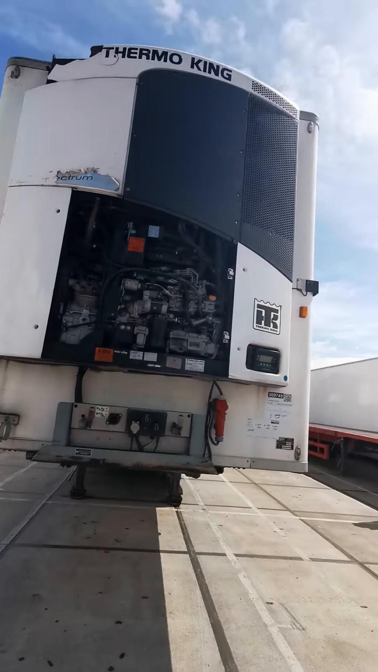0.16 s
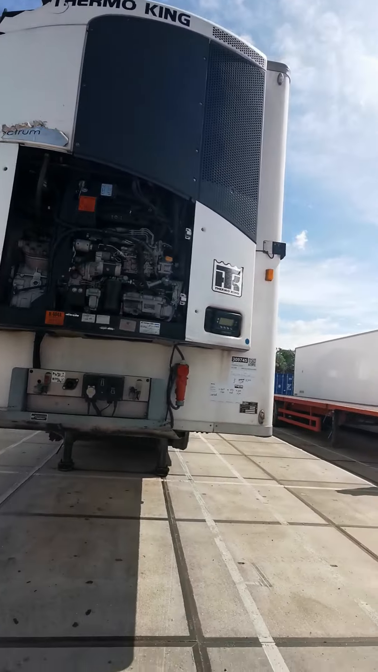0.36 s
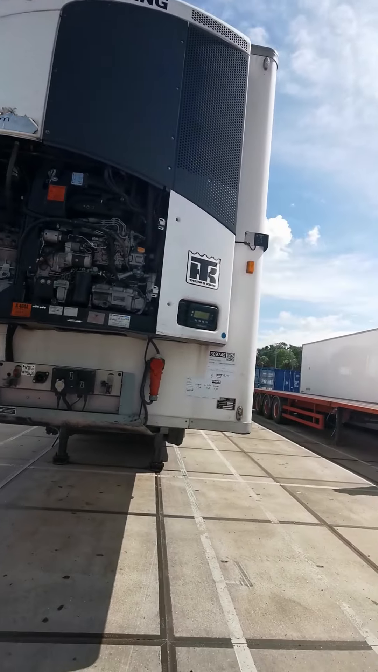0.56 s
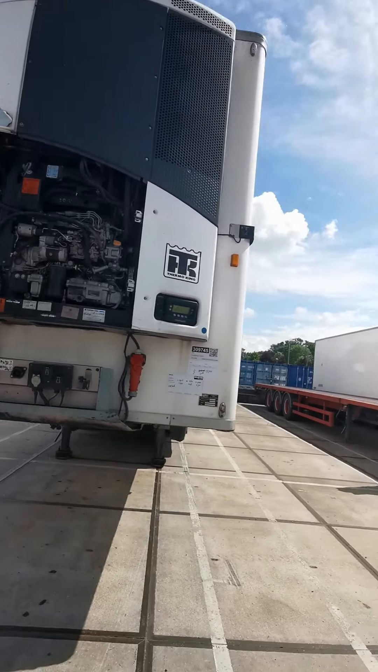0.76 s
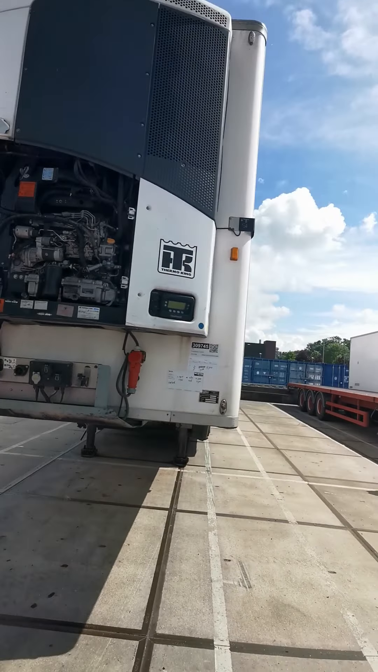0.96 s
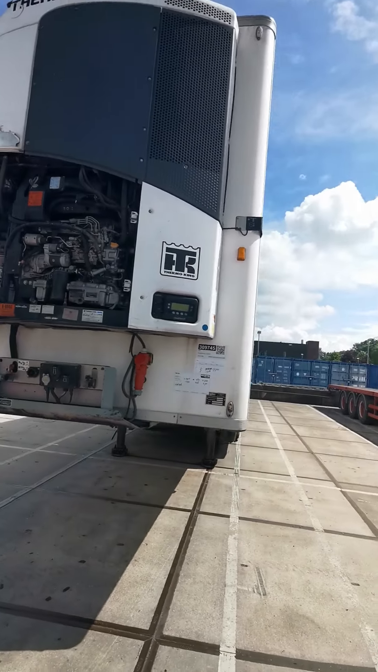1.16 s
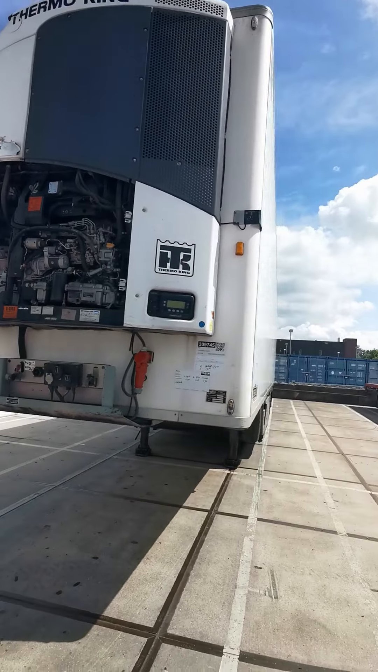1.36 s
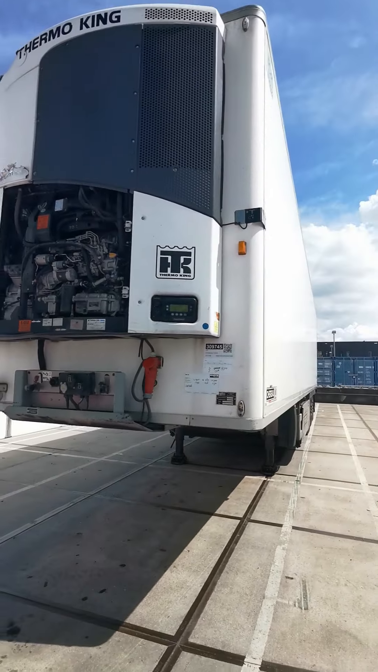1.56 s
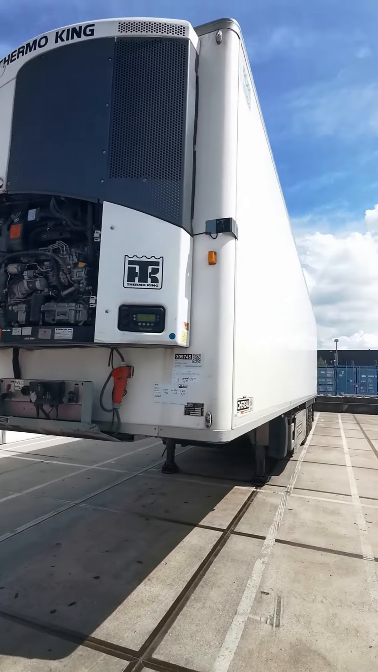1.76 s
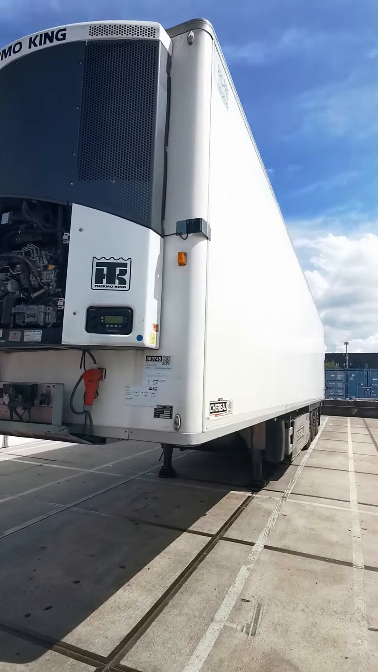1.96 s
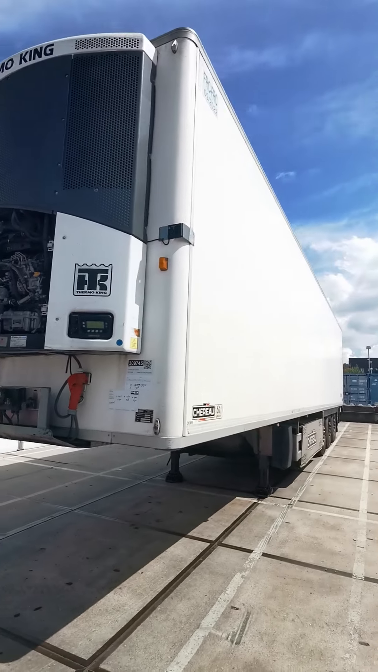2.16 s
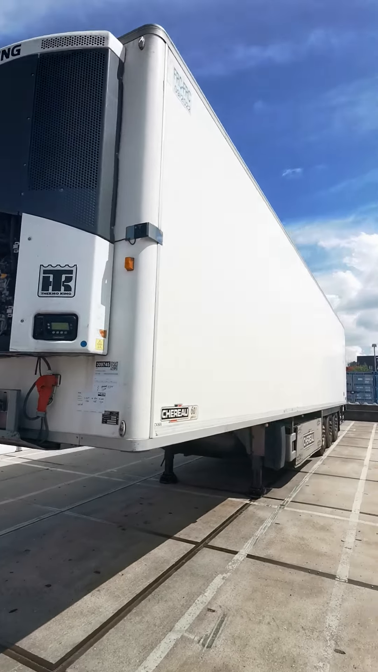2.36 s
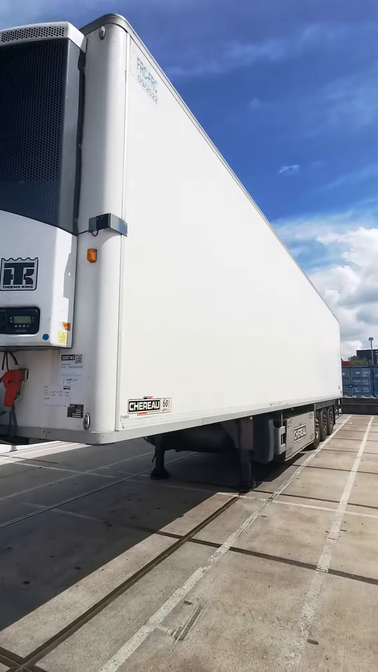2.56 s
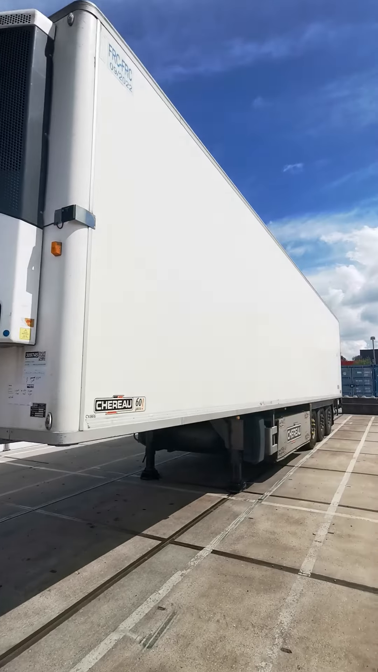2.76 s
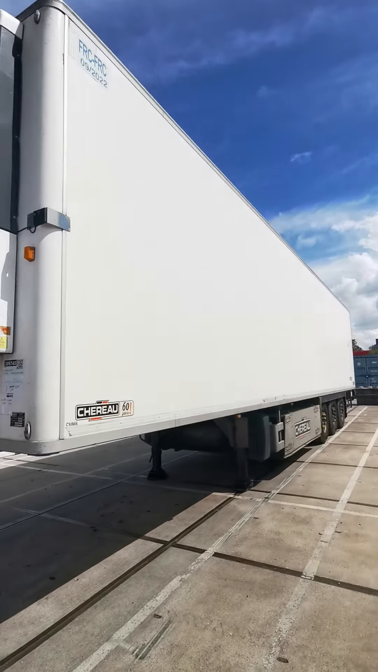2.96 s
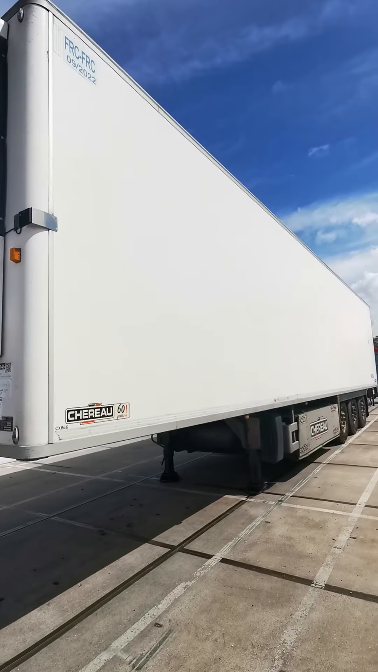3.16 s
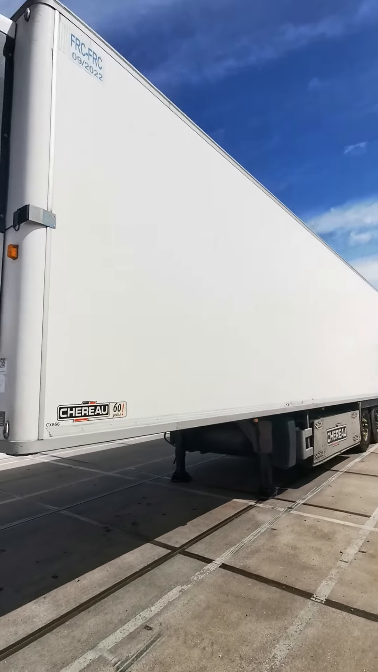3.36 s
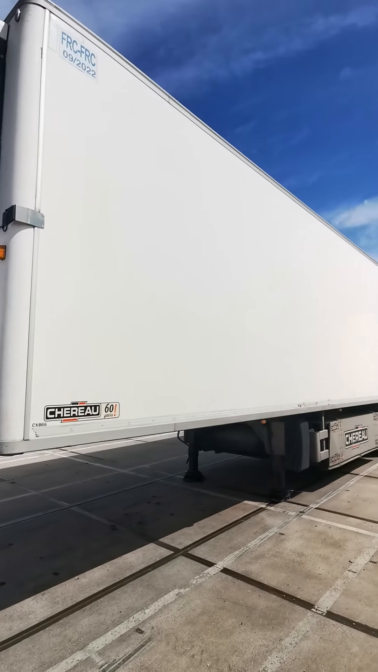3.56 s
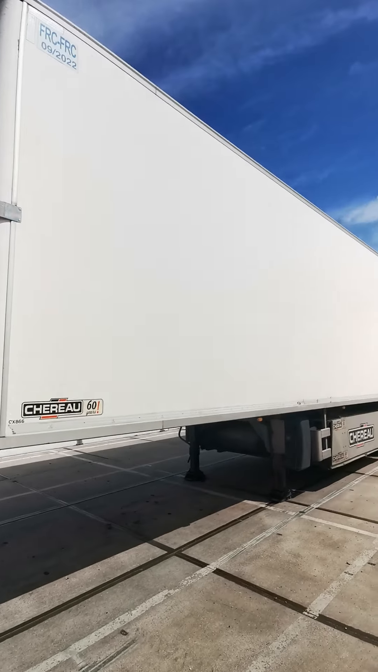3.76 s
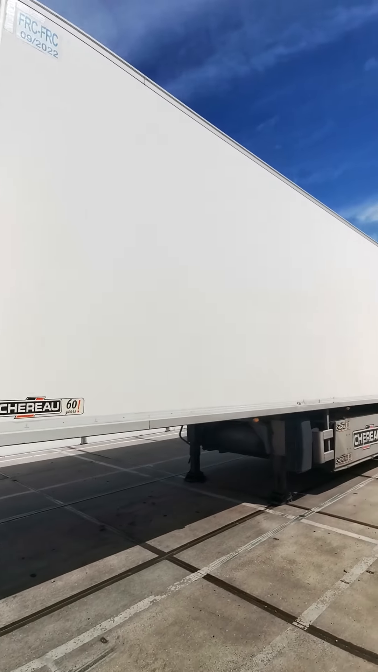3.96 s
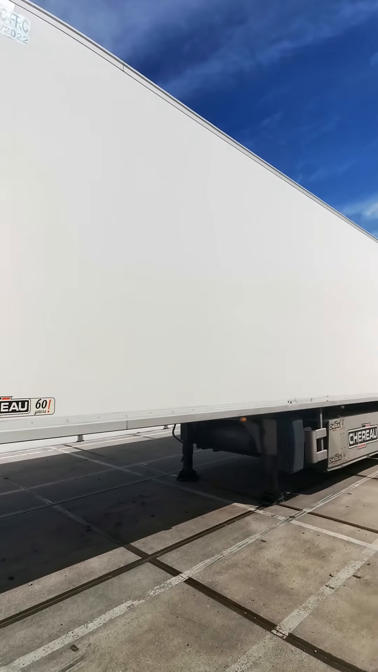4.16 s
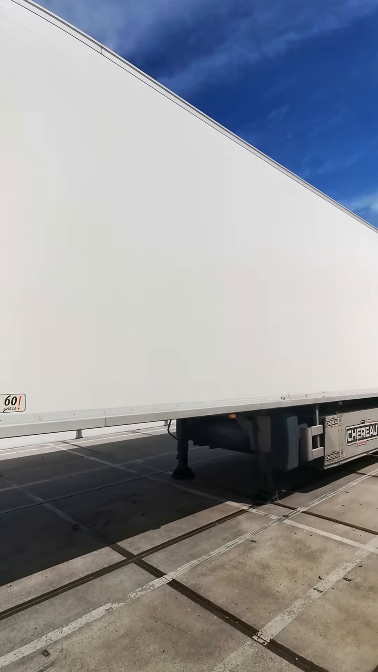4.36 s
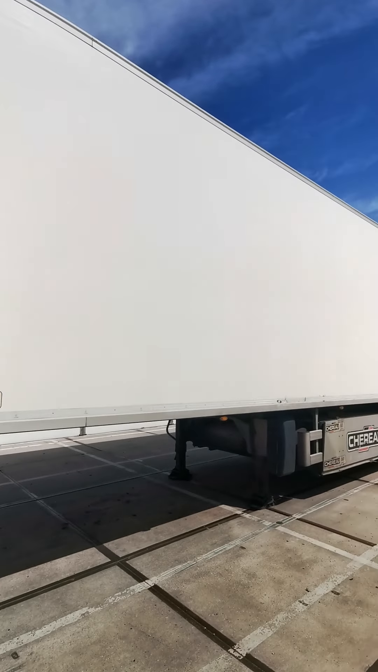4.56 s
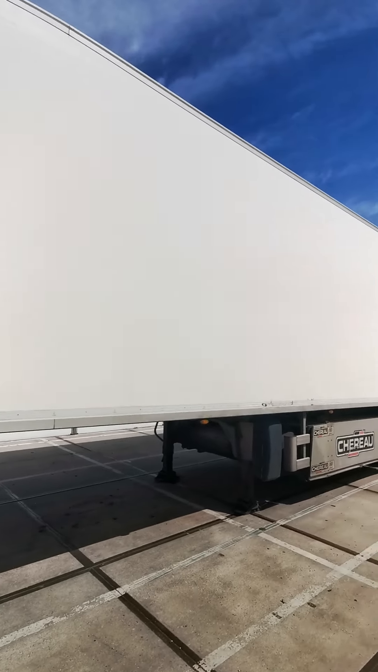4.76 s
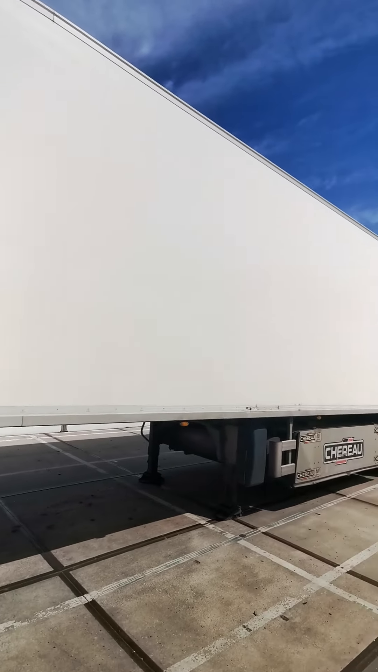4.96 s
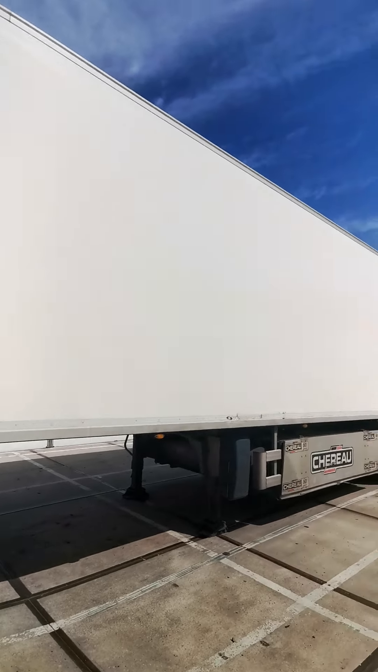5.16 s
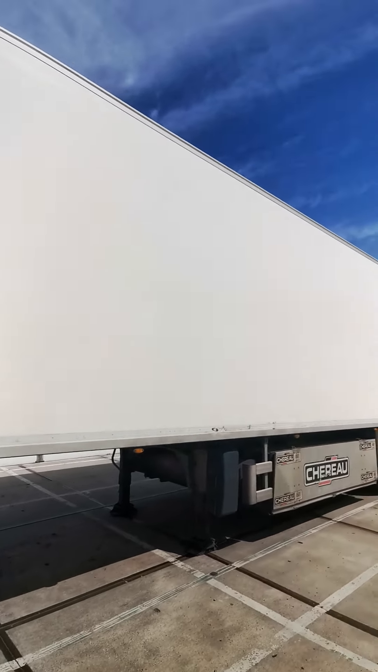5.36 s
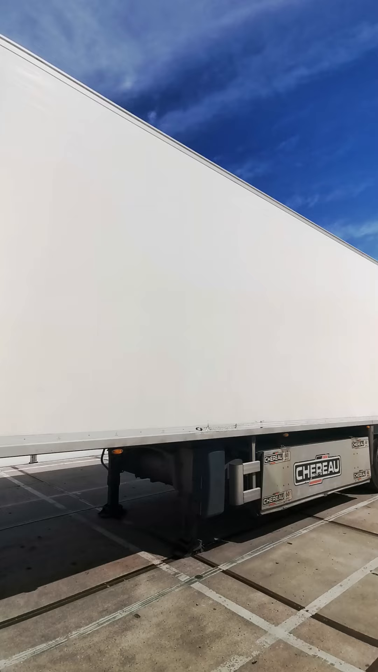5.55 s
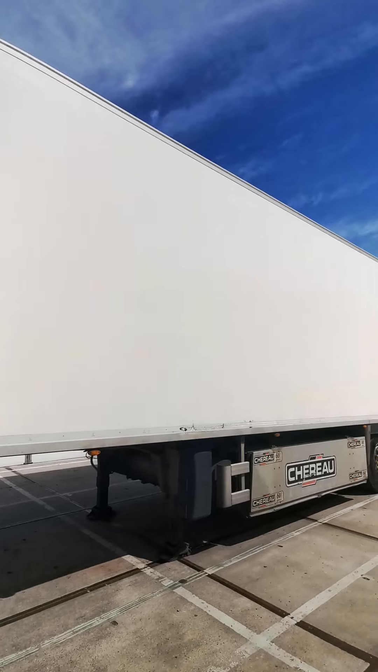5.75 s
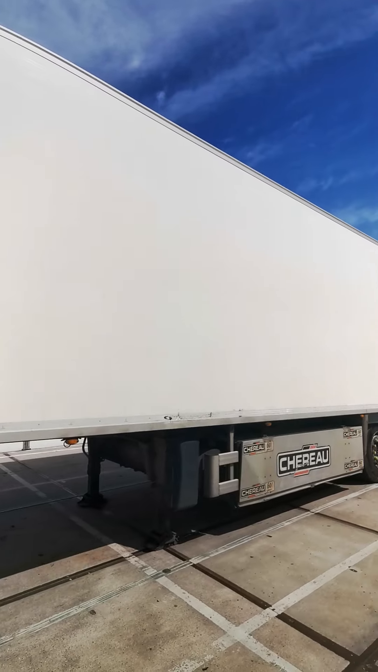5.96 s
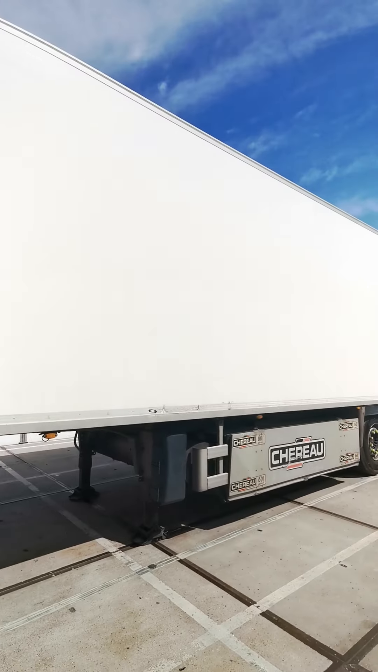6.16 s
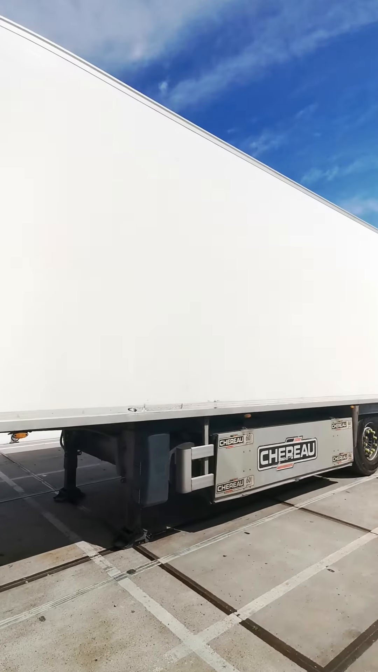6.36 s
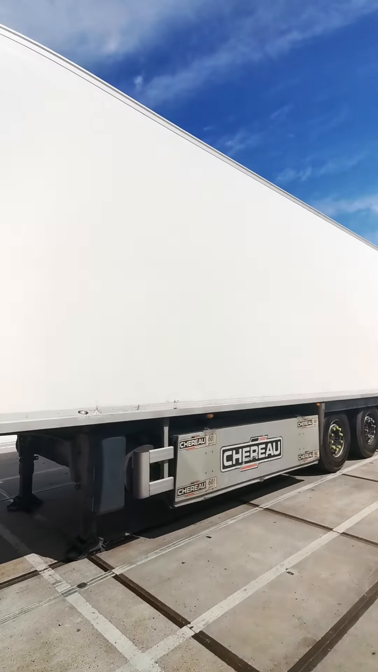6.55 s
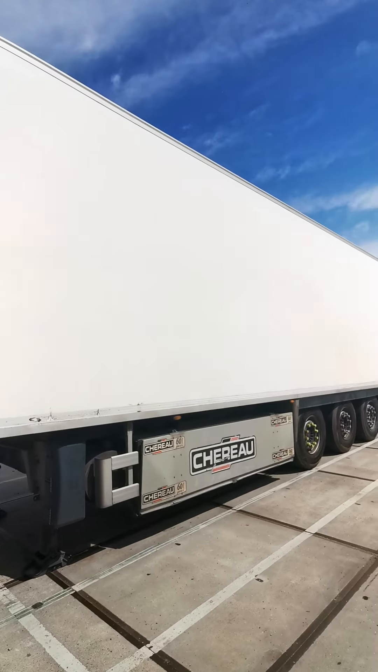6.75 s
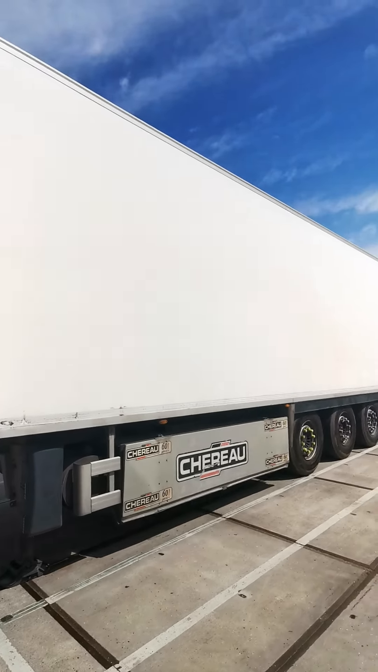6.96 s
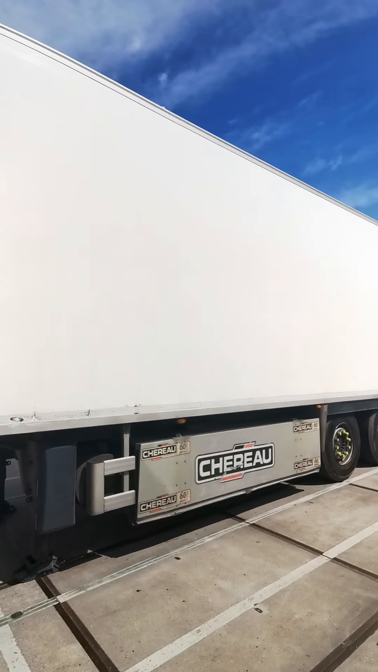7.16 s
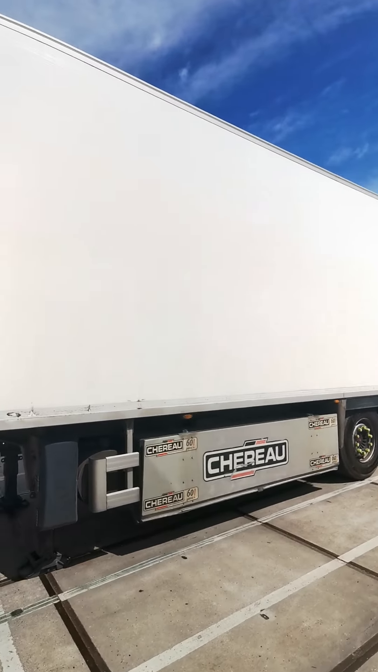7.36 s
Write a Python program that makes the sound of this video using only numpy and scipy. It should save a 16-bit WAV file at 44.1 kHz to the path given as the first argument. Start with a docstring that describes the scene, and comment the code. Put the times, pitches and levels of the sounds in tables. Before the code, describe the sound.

A small diesel engine clatters and hums steadily in an open yard, fading to a dull drone as the microphone moves away amid wind bumps and sharp clicks.

```python
"""A four-cylinder diesel on a trailer refrigeration unit runs at a steady speed in an open yard.
First the microphone is about 2 m from the open engine bay: clatter from noise swelling at each firing, hum from crank orders.
From 1.3 s to 2.3 s gusts, surges and dull bumps of filtered noise catch it; near 3 s it rounds the corner past the side grille.
At 4.3 s a side panel rings; from 4.9 s ticks ring the right port and duck the gain, with brief rubs from 5.1 s.
Alongside the trailer, out to 9.5 m, the clatter is faint and dull while the exhaust hum stays."""
import sys
import numpy as np
from scipy import signal
from scipy.fft import rfft, irfft, next_fast_len
from scipy.io import wavfile
from scipy.ndimage import uniform_filter1d, minimum_filter1d

SR = 44100
rng = np.random.default_rng(int(sys.argv[2]) if len(sys.argv) > 2 else 0)


def file_out(sig):
    """Save sig as 16-bit WAV at sys.argv[1]."""
    # one column per channel
    cols = np.atleast_2d(sig).T
    # limit, then scale
    lim = np.clip(cols, -1, 1)
    pcm = np.round(lim * 32767).astype(np.int16)
    wavfile.write(sys.argv[1], SR, pcm)


N = 330309
TIME = np.arange(N) / SR

# Levels are relative settings; each source adds its own gain.
# walk away from the engine bay: [t/s, distance to the engine/m]
WALK = [(0, 1.94), (0.8, 1.96), (3.1, 2.71), (4.4, 3.9), (5.2, 5.64), (7.4, 9.5)]
# how far the trailer hides the engine: [t/s, 0 open bay .. 1 corner .. 2 alongside]
SHADOW = [(0, 0.41), (1.2, 0.44), (2.4, 0.88), (4.0, 1.19), (4.7, 1.23), (5.4, 2.15), (7.5, 2.245)]
# steady breeze: [t/s, buffeting level/dB, rush level/dB]
BREEZE = [(0, -33, -30.5), (1.8, -32, -31.5), (2.9, -53, -28.5), (4.2, -29.5, -28), (5.1, -31, -30),
          (7.4, -27.5, -31.5)]
# gusts on top of it: [t/s, half length/s, buffeting level/dB, rush level/dB]
GUSTS = [(.17, .22, -33, -35), (1.33, 0.056, -20, -23.5), (2.093, 0.12, -28, -27), (2.207, .055, -19, -25),
         (4.0, 0.14, -27, -47), (4.955, 0.15, -20.5, -40), (5.444, 0.03, -45, -31.5),
         (5.805, 0.054, -41, -30.5), (6.29, 0.42, -30, -44), (7.43, 0.11, -22.5, -46)]
# spectrum of the buffeting: [f/Hz, level/dB]
BUFFET_SPECTRUM = [(10, -26), (22, 0), (35, -0.5), (60, -6.5), (95, 0), (135, -4), (220, -40), (800, -110)]
# spectrum of the rushing air: [f/Hz, level/dB]
RUSH_SPECTRUM = [(80, -2), (115, -15.5), (155, 3), (250, -2.5), (330, -9), (430, -13), (560, -16),
                 (900, -20.5), (2000, -32)]
# air surging across the microphone: [t of breaking off/s, build-up/s, level/dB]
SURGES = [(1.39, .08, -33), (1.93, .06, -32), (2.11, .1, -28.5), (2.272, .1, -26)]
# dull bumps on the microphone: [t/s, level/dB]
BUMPS = [(1.335, -22), (2.04, -22), (2.215, -23), (2.238, -21), (6.305, -19.5)]
# ticks at the right port: [t/s, level/dB, extra drive of the top two resonances/dB]
TICKS = [(4.897, -21, -8), (5.0424, -22, -3), (5.057, -6.5, -4), (5.2182, 2, 2.5), (5.9041, -5.5, 2.5),
         (5.9814, -15, 1), (6.1626, -8, 1), (6.6182, -21, -7), (6.6377, -18.5, 2), (6.7932, -22.5, -4),
         (6.9973, -9, 3.5), (7.0604, -10, -3), (7.1667, -11.5, -10), (7.2152, -18.5, -6), (7.4843, -3, 7.5)]
# a finger brushing the port: [t/s, level/dB, time constant of swell and fade/s]
RUBS = [(5.108, -26.5, 0.027), (5.28, -38, 0.058), (7.275, -49, 0.027)]
# resonances of the microphone port: [f/Hz, width/Hz, level/dB]
PORT_RESONANCES = [(2600, 1400, -2), (5000, 2400, -2), (6600, 700, -1), (10900, 1800, -8),
                   (14800, 2500, -18)]
# likeness of the two channels: [f/Hz, coherence]
LIKENESS = [(40, 0.057), (130, 0.33), (290, 0.75), (640, 0.64), (1400, 0.98), (2100, 0.48), (3000, 0.05),
            (15000, 0.05)]
# phase by which the left port leads the right: [f/Hz, phase/rad]
LEFT_LEAD = [(60, 0.015), (200, 0.0078), (650, -0.2), (1500, 1.64), (2200, 1.51)]
# ring of the injectors: [f/Hz, t60/s]
INJECTOR_MODES = [(3480, .02), (3720, .024), (3990, .018)]
# ring of the block under the hard knock: [f/Hz, t60/s]
KNOCK_MODES = [(1660, .02), (1775, .05), (1850, .052), (1945, .04), (2100, .022)]
# openings that beam the knock: [t of passing/s, half the time in the beam/s, level/dB]
KNOCK_BEAMS = [(.9, .22, 5), (2.9, .7, 4)]
# engine colour at the open bay, the corner and alongside, per port: [f/Hz, level/dB]
BAY_LEFT = [(300, 1), (450, 0.5), (650, 0), (900, -2), (1500, -12), (1850, -6), (2550, -1.5), (3000, -6),
            (5000, -8), (6900, -5.5), (8000, -15.5), (12000, -24), (15700, -34)]
BAY_RIGHT = [(300, 12), (480, -11), (650, 4.5), (950, -3.5), (1300, 0.5), (1850, -1), (2200, 2.5),
             (3000, -8.5), (6500, -4), (7600, -21), (9500, -16), (10800, -12), (13800, -21), (15500, -11)]
CORNER_LEFT = [(300, -1), (500, 1.5), (700, -5.5), (1400, -2), (1850, -8), (2600, -2), (3200, -8),
               (5000, -14.5), (6900, -13), (8000, -23), (12000, -31), (15700, -35)]
CORNER_RIGHT = [(300, 5), (620, 7), (1000, 1.5), (1400, 3.5), (1850, 7.5), (2150, 7), (2900, -7),
                (4200, -6), (6600, -18), (7800, -25), (9500, -24.5), (10800, -16), (14000, -23),
                (15500, -19)]
SIDE_LEFT = [(300, -3), (500, 13.5), (700, -7), (1400, -2), (1850, -1), (2400, -5), (3500, -7),
             (5000, -11.5), (6900, -13), (8000, -23.5), (12000, -31), (15700, -44)]
SIDE_RIGHT = [(300, 14), (500, 12), (780, 7.5), (1350, 5), (1650, 0.5), (2300, 3), (3300, -6.5),
              (6500, -10), (7700, -25), (9500, -22.5), (10900, -14), (13500, -26), (15500, -22)]
# belt-driven fans and alternator: [f/Hz, level/dB, left minus right/dB]
FAN_TONES = [(233.8, -35, 1), (250.2, -39, 7), (446, -52.5, -1.5)]
# weaker crank orders, each with its own beam: [order, level/dB, t of passing/s, half the time in it/s]
OVERTONES = [(4.5, -31, 1.8, 5.1), (5.5, -39, 1.5, 2.2), (13, -42, 1.4, .8), (13, -40, 4.2, .6),
             (14, -45, 1.4, 1), (15, -42, .3, .4), (18, -44, 1.6, .4), (19, -45, 1.3, .8),
             (20, -41.5, .4, .7), (20, -39, 2.7, .5), (21, -39, 2.4, 1), (22, -43, .3, .4),
             (23, -37, 1.7, .4), (23, -39, 3.5, .4), (24, -41, 1.2, .7), (26, -43, 2, 2.5),
             (28, -43, .6, .7), (30, -43, .8, .6), (32, -42, 1, .55), (34, -46, 2.2, 2), (38, -43, .3, .35),
             (51.5, -42, .9, .35), (51.5, -41, 3.4, .4), (54, -41, 1.6, .4), (58, -42, .7, .8),
             (60, -43, .7, .6), (60, -43, 2.7, .5), (63, -42, 2.6, .6), (66.5, -43, 1.8, .5),
             (68, -43, .9, .35), (72, -45, 1.3, .7)]
# strong crank orders: [order, level/dB, share of the exhaust's fall, standing-wave swing/dB,
# t of a crest/s, time between crests/s]
STRONG_ORDERS = [(2, -22, 0.8, 1, 0.091, 2.97), (3, -40, 0.35, -3, 5.1, 1.8), (4, -17, 1.12, 0.5, 1.5, 4.6),
                 (6, -29.5, 0.35, 2.5, 0.11, 3.27), (8, -39.5, 0.15, 1, 0.9, 2.7),
                 (10, -35, 0.51, 3.5, 1.4, 4.8), (12, -38.5, 0.69, 5, 2.01, 3.1),
                 (14, -52.5, 0.47, -1, 0.95, 2)]
# exhaust hum, falling as the roof edge hides the pipe: [t/s, level/dB]
EXHAUST = [(0, -1.5), (1.7, -4), (2.8, -10.5), (4.1, -10.5), (5.2, -17.5), (6.8, -13.5)]

CRANK_HZ = 30.36
KNOCK_CYLINDER_DB, INJECTOR_CYLINDER_DB = (-10, -12, 0, -9), (-2, -1, 2, -2)   # in firing order
FIRING_VARY_DB = 1.2   # no two firings are equally strong
FIRING_LAG_TURNS, FIRING_JITTER_S = .235, .0004
BOOM_LAG_S, BOOM_REACH_M = 0.0042, (2.4, 4.2)   # full lag up to the first distance, none past the second
PORT_LAG_S = 0.000082   # the hum reaches the right port this much later
CLATTER_DB, HISS_DB = -23, -28   # source settings before the distance loss
FAN_BEAM_DB, FAN_BEAM_S, FAN_BEAM_HALF_S = 3, 3.46, 1.53   # the side grille beams the fan hiss
PANEL_HZ, PANEL_WIDTH_HZ, PANEL_BEAM_S, PANEL_BEAM_HALF_S = 2160, 61, 4.3, 0.5
WAFT_DB = 0.92   # moving air makes the hidden engine swell and sink
THROB = 0.35   # depth of the firings in the rush of air
CUTOFF_HZ = 15900


def from_db(db):
    """Amplitude factor of a level in dB."""
    return 10 ** (np.asarray(db) / 20)


def rms_one(x):
    """Scale to an RMS of one."""
    return x / np.sqrt(np.mean(x ** 2) + 1e-20)


def in_time(rows):
    """Each column of a curve at every sample."""
    s, *columns = np.transpose(rows)
    return [np.interp(TIME, s, c) for c in columns]


def at_hz(points, hz):
    """A spectrum read on a log-frequency axis."""
    f, value = np.transpose(points)
    return np.interp(np.log(hz + 1e-3), np.log(f), value)


def drift(rate_hz):
    """Slow random wander of unit RMS, computed every 100 samples."""
    r = np.exp(-200 * np.pi * rate_hz / SR)
    noise = rng.standard_normal(N // 100 + 2002)
    slow = signal.lfilter([1], [1, -2 * r, r * r], noise)[2000:]   # drop the filter's start
    return np.interp(np.arange(N) / 100, np.arange(len(slow)), rms_one(slow))


def lobe(s, half_s):
    """A bell in time, 0 to 1: passing a beam of sound, or a gust coming and going."""
    return np.exp(-((TIME - s) / half_s) ** 2)


def pan(left_minus_right_db):
    """Gains of the left and right channel."""
    return from_db([[left_minus_right_db / 2], [-left_minus_right_db / 2]])


def cut(x, hz, kind, order=2):
    """Butterworth filter."""
    return signal.sosfilt(signal.butter(order, hz, kind, fs=SR, output="sos"), x)


def coloured(pair, left, right):
    """Two unrelated noises become stereo with the given spectra, port likeness and phase lead."""
    size = next_fast_len(N)
    hz = np.arange(size // 2 + 1) * SR / size
    mid, side = rfft(pair, size)
    alike = np.clip(at_hz(LIKENESS, hz), -1, 1)
    both = np.sqrt(1 + alike) * mid + np.sqrt(1 - alike) * side * [[1], [-1]]
    both[1] *= np.exp(-1j * at_hz(LEFT_LEAD, hz))
    return irfft(both * from_db([at_hz(left, hz), at_hz(right, hz)]), size)[:, :N]


def air_flow():
    """Strength of buffeting and of rush: each gust swells and dies on top of the breeze."""
    power = from_db(in_time(BREEZE)) ** 2
    for s, half_s, buffet_db, rush_db in GUSTS:
        power = power + from_db([[buffet_db], [rush_db]]) ** 2 * lobe(s, half_s)
    return np.sqrt(power)


def wind(turns, lumps_db=2.0, flutter_db=1.0, buffet_gain_db=-4.5, rush_gain_db=0.0, apart=0.43, left_db=0.53):
    """Lumpy bass buffeting, partly each port's own, and a rush of air and exhaust gas throbbing with firings."""
    buffeting, rushing = air_flow()
    eddies = rms_one(cut(rng.standard_normal((2, N)), [20, 70], "band"))
    shared = rms_one(coloured(rng.standard_normal((2, N)), BUFFET_SPECTRUM, BUFFET_SPECTRUM))
    buffet = (shared + apart * eddies) * rms_one(from_db(lumps_db * drift(15)))
    rush = cut(coloured(rng.standard_normal((2, N)), RUSH_SPECTRUM, RUSH_SPECTRUM), 1280, "low")
    rush = rms_one(rush * from_db(flutter_db * drift(34)))
    rush = rms_one(rush * (1 + THROB * np.cos(4 * np.pi * turns)))   # two firings a turn
    # the left port takes more of the air, most of all alongside the trailer
    lean = from_db(left_db * (in_time(SHADOW)[0] + 1.0) * np.array([[1], [-1]]))
    return (from_db(buffet_gain_db) * buffeting * buffet + from_db(rush_gain_db) * rushing * rush) * lean


def surges(band_hz=(220, 470), stop_s=.012, apart=.5):
    """Air catches the edge of the microphone: a hollow roar builds and breaks off."""
    push = sum(from_db(db) * np.exp(-np.maximum((s - TIME) / build_s, (TIME - s) / stop_s))
               for s, build_s, db in SURGES)
    air = rng.standard_normal(N) + apart * rng.standard_normal((2, N))
    return push * rms_one(cut(air, band_hz, "band", order=3))


def bumps(decay_s=.014, low_hz=150, high_hz=480):
    """Each bump on the microphone is a short, dull puff of noise that starts at once and dies away."""
    push = sum(from_db(db) * (TIME >= s) * np.exp(-np.abs(TIME - s) / decay_s) for s, db in BUMPS)
    puff = rms_one(cut(rng.standard_normal(N), [low_hz, high_hz], "band"))
    return cut(push * puff, 520, "low", order=6)


def port(x, bright):
    """The resonances of the microphone port, in parallel; the top two have their own drive."""
    out = 0
    for k, (hz, width_hz, db) in enumerate(PORT_RESONANCES):
        r = np.exp(-np.pi * width_hz / SR)
        drive = (bright if k > 2 else x) + 1e-18
        poles = [1, -2 * r * np.cos(2 * np.pi * hz / SR), r * r]
        ring = signal.lfilter([(1 - r * r) / 2, 0, (r * r - 1) / 2], poles, drive)
        out = out + (-1) ** k * from_db(db) * ring
    return out


def handling(tick_db=3.5, grain_db=-1.5, leak_db=-30, rub_hz=(5400, 9500)):
    """Sharp ticks and grainy rubs ring the right port and barely reach the left."""
    clicks = np.zeros((2, N))   # drives of the lower and of the top resonances
    for s, db, bright_db in TICKS:
        clicks[:, min(round(s * SR), N - 1)] = from_db(db + tick_db) * from_db([0, bright_db])
    height = np.abs(port(signal.unit_impulse(64), signal.unit_impulse(64))).max()
    friction = cut(rng.standard_normal(N), rub_hz, "band") * from_db(grain_db * drift(120))
    pressure = sum(from_db(db) * np.exp(-np.abs(TIME - s) / swell_s) for s, db, swell_s in RUBS)
    rub = pressure * rms_one(port(friction, friction))
    return (port(*clicks) / height + rub) * from_db([[leak_db], [0]])


def crank(wander=.0004):
    """Turns of the crankshaft; the governor holds the speed almost still."""
    return np.cumsum(CRANK_HZ * (1 + wander * drift(1.5))) / SR


def rattle(turns, repeat, knock_depth, knock_decay, cylinder_db, count=6):
    """Valves and injectors make nearly the same rattle every two turns, swelling at each firing."""
    size = round(2 * SR / CRANK_HZ)
    place = (turns / 2 % 1 * size).astype(int)
    # the pattern that is heard changes slowly as the microphone moves
    same, patterns = 0, irfft(np.exp(2j * np.pi * rng.random((count, 2, size // 2 + 1))), size)
    for k, pattern in enumerate(rms_one(patterns)):
        away = np.clip(np.abs(np.linspace(0, count - 1, N) - k), 0, 1)
        same = same + np.cos(np.pi / 2 * away) * pattern[:, place]
    share = np.clip(repeat, 0, 1)
    noise = np.sqrt(share) * same + np.sqrt(1 - share) * rng.standard_normal((2, N))
    firing, since = np.divmod(2 * turns, 1)   # since: fraction of a firing interval
    firing = firing.astype(int)
    vary = from_db(FIRING_VARY_DB * rng.standard_normal(N // 100))
    strength = from_db(cylinder_db)[firing % len(cylinder_db)] * vary[firing]
    swell = 1 + knock_depth * strength * np.exp(-since / knock_decay)
    return noise * swell / np.sqrt(uniform_filter1d(swell ** 2, size=size))


def struck(turns, modes, cylinder_db, vary_db, chatter_s, chatter_share=.25):
    """Each firing strikes a set of modes: a clean blow and a brief chatter, so no two strokes ring alike."""
    at = np.flatnonzero(np.diff(np.floor(2 * turns)) > 0)
    jitter = (FIRING_JITTER_S * SR * rng.standard_normal(len(at))).astype(int)
    at = np.clip(at + jitter, 0, N - 1)
    blows = np.zeros(N)
    blows[at] = from_db(np.resize(cylinder_db, len(at)) + vary_db * rng.standard_normal(len(at)))
    r = np.exp(-1 / (chatter_s * SR))
    chatter = signal.lfilter([np.sqrt(1 - r * r)], [1, -r], blows) * rng.standard_normal((2, N))
    drive = np.sqrt(1 - chatter_share) * blows + np.sqrt(chatter_share) * chatter + 1e-18
    out = 0
    for hz, t60_s in modes:
        r, w = from_db(-60 / (t60_s * SR)), 2 * np.pi * hz / SR
        out = out + signal.lfilter([0, np.sin(w)], [1, -2 * r * np.cos(w), r * r], drive)
    return out


def panel(turns, near_db, ring_db=-35.0, pan_db=-9.0):
    """The engine's rattle shakes a side panel, which rings unevenly and is heard only just past the corner."""
    shake = rattle(turns, repeat=0.69, knock_depth=0.3, knock_decay=0.3, cylinder_db=(0, 0, 0, 0))
    band_hz = [PANEL_HZ - PANEL_WIDTH_HZ / 2, PANEL_HZ + PANEL_WIDTH_HZ / 2]
    ring = rms_one(cut(shake, band_hz, "band", order=1))
    uneven_db = 1.5 * drift(14)
    beam = lobe(PANEL_BEAM_S, PANEL_BEAM_HALF_S)
    return ring * beam * from_db(ring_db + near_db + uneven_db) * pan(pan_db)


def injectors(turns, near_db, tick_db=-40.0, beam_db=6.0, beam_s=3.1, beam_half_s=1.2):
    """The injectors tick once a firing, clearest through the side grille."""
    ticks = struck(turns, INJECTOR_MODES, INJECTOR_CYLINDER_DB, vary_db=1.0, chatter_s=.003)
    in_sight = np.clip(2 - in_time(SHADOW)[0], 0, 1)
    return ticks * in_sight * from_db(tick_db + near_db + beam_db * lobe(beam_s, beam_half_s))


def hard_knock(turns, near_db, knock_db=-30.0, pan_db=-4.0):
    """The cylinders knock on the block, one far harder than the rest; beamed by the bay and the side grille."""
    knocks = struck(turns, KNOCK_MODES, KNOCK_CYLINDER_DB, vary_db=1.0, chatter_s=.004)
    in_sight = np.clip(1.7 - in_time(SHADOW)[0], 0, 1)
    beam_db = sum(db * lobe(s, half_s) for s, half_s, db in KNOCK_BEAMS)
    return knocks * in_sight * from_db(knock_db + near_db + beam_db) * pan(pan_db)


def clatter(turns, clatter_db, hiss_db, ring_hz=1450, split_hz=3000, valve_hz=4500,
            body_db=4.0, knock_db=4.0, valve_db=5.5, hiss_gain_db=9.0):
    """The block growls and knocks, the valves tick and the fans hiss; the trailer shades them all."""
    shadow, = in_time(SHADOW)
    direct = 1 / (1 + shadow ** 2)   # out of sight, echoes smear the beats
    uneven = (-1.1, 0.88, 0.78, -0.99)   # dB of each cylinder
    body = rattle(turns, repeat=.68, knock_depth=0.49 * direct, knock_decay=0.78, cylinder_db=uneven)
    knock = rattle(turns, repeat=.55, knock_depth=0.7 * direct, knock_decay=.6,
                   cylinder_db=(-3.0, -6.0, 4.0, 1.0))
    valves = rattle(turns, repeat=.4, knock_depth=.4 * np.sqrt(direct), knock_decay=.4,
                    cylinder_db=(-2.0, -2.0, 4.0, -1.0))
    hiss = rattle(turns, repeat=0.16, knock_depth=0.76 * np.sqrt(direct), knock_decay=0.18, cylinder_db=uneven)
    block = from_db(body_db) * cut(body, ring_hz, "low", order=4)
    block = block + from_db(knock_db) * cut(knock, [ring_hz, split_hz], "band", order=3)
    top = from_db(valve_db) * cut(valves, [split_hz, valve_hz], "band", order=3)
    top = top + from_db(hiss_gain_db) * cut(hiss, valve_hz, "high", order=6)
    source = from_db(clatter_db) * block + from_db(hiss_db) * top
    views = [(BAY_LEFT, BAY_RIGHT), (CORNER_LEFT, CORNER_RIGHT), (SIDE_LEFT, SIDE_RIGHT)]
    heard = sum(np.clip(1 - np.abs(shadow - k), 0, 1) * coloured(source, *view)
                for k, view in enumerate(views))
    waft_db = WAFT_DB * np.maximum(shadow - 1, 0) * drift(3.9)
    return from_db(3.5 + waft_db) * cut(heard, 184, "high")


def tone(turns, db, waver_db, pan_db, spread_rad):
    """One line; echoes from ground and trailer make it waver, its phase oppositely in each channel."""
    phase = 2 * np.pi * turns + spread_rad * drift(0.74) * np.array([[1], [-1]])
    return np.sqrt(2) * from_db(db + waver_db * drift(2.1)) * pan(pan_db) * np.cos(phase)


def fans(turns, near_db):
    """Belt-driven fans and alternator whine in step with the crank and fade with distance."""
    return sum(tone(hz * turns / CRANK_HZ + rng.random(), db + near_db,
                    waver_db=3.5, pan_db=pan_db, spread_rad=0.36) for hz, db, pan_db in FAN_TONES)


def overtones(turns, near_db, shade_db=1.0, shade_hz=1800, off_beam_db=-14.0):
    """Weaker crank orders come and go as their beams are passed; past the corner the higher ones fade more."""
    hidden = np.maximum(in_time(SHADOW)[0] - 1, 0)
    out = 0
    for order, db, s, half_s in OVERTONES:
        beam_db = off_beam_db * (1 - lobe(s, half_s))
        loss_db = shade_db * hidden * order * CRANK_HZ / shade_hz
        out = out + tone(order * turns + rng.random(), db + near_db + beam_db - loss_db,
                         waver_db=1.5, pan_db=-4.0 * (order > 13), spread_rad=0.45)
    return out


def standing_wave(crest_s, spacing_s):
    """The walk passes through the crests and troughs that ground and trailer set up for a low tone."""
    return np.cos(2 * np.pi * (TIME - crest_s) / spacing_s)


def exhaust_hum(turns):
    """Two sharp exhaust puffs a turn give the deep beat: strong crank orders, in step near the bay."""
    exhaust_db, = in_time(EXHAUST)
    hidden = np.maximum(in_time(SHADOW)[0] - 1, 0)
    arriving = turns - CRANK_HZ * PORT_LAG_S * np.array([[0], [1]])
    # near the bay the casing's boom drags the lowest order
    boom_lag = CRANK_HZ * BOOM_LAG_S * np.interp(in_time(WALK)[0], BOOM_REACH_M, [1, 0])
    out = 0
    for order, db, share, swing_db, crest_s, spacing_s in STRONG_ORDERS:
        # far off, echoes scatter the phases of the higher orders
        scatter = hidden * rng.uniform(-.5, .5) * (order > 5)
        order_turns = order * (arriving - boom_lag * (order < 2.5)) + scatter
        level_db = db + share * exhaust_db + swing_db * standing_wave(crest_s, spacing_s)
        out = out + tone(order_turns, level_db, waver_db=0.5, pan_db=3.0, spread_rad=0.041)
    return out


def scene():
    """One crankshaft drives every engine layer; wind, surges, bumps and handling arise at the microphone."""
    turns = crank()
    fired = turns - FIRING_LAG_TURNS
    spread_db = -20 * np.log10(in_time(WALK)[0])   # loss with distance, re 1 m
    near_db = spread_db - spread_db.max()   # re the nearest point of the walk
    hiss_db = HISS_DB + spread_db + FAN_BEAM_DB * lobe(FAN_BEAM_S, FAN_BEAM_HALF_S)
    at_microphone = wind(turns) + surges() + bumps() + handling()
    details = panel(fired, near_db) + injectors(fired, near_db) + hard_knock(fired, near_db)
    rattling = clatter(fired, CLATTER_DB + spread_db, hiss_db)
    tones = fans(turns, near_db) + overtones(turns, near_db) + exhaust_hum(turns)
    return at_microphone + details + rattling + tones


def record(dry, threshold_db=-15, slope=.45, release_db_per_s=48):
    """Gain control ducks at once on sharp treble peaks and recovers slowly; the top is cut."""
    peak_db = 20 * np.log10(np.abs(cut(dry, 2360, "high")).max(axis=0) + 1e-9)
    over_db = slope * np.maximum(peak_db - threshold_db, 0)
    duck_db = np.maximum.accumulate(over_db + release_db_per_s * TIME) - release_db_per_s * TIME
    gain_db = uniform_filter1d(minimum_filter1d(-duck_db, size=260), size=130)
    top_cut = signal.ellip(10, .2, 80, CUTOFF_HZ, fs=SR, output="sos")
    return signal.sosfilt(top_cut, dry * from_db(gain_db))


dry = scene()
out = record(dry)
file_out(out)
```